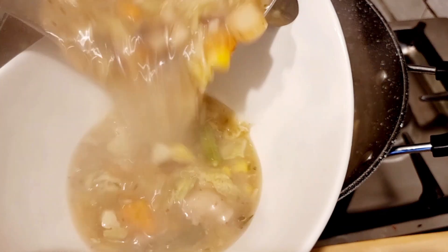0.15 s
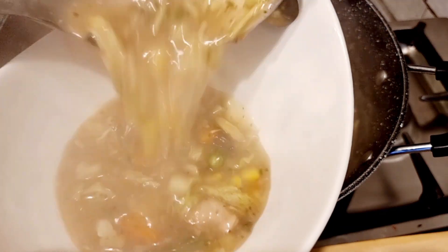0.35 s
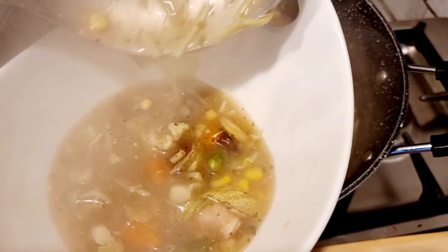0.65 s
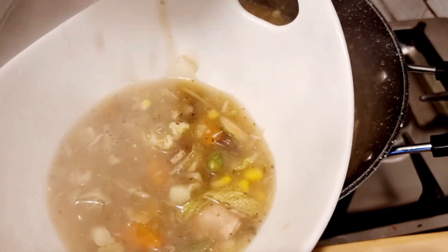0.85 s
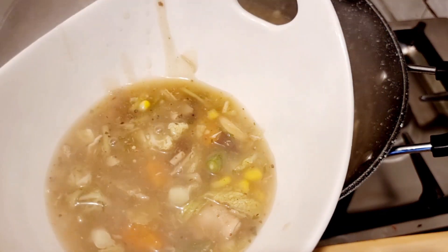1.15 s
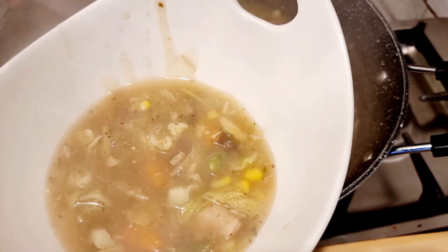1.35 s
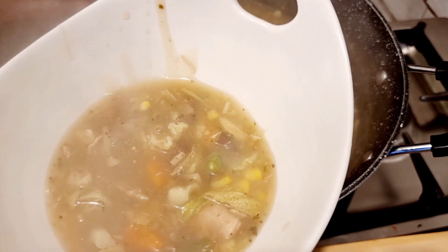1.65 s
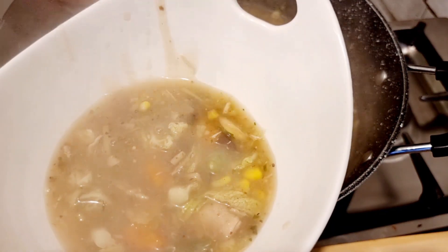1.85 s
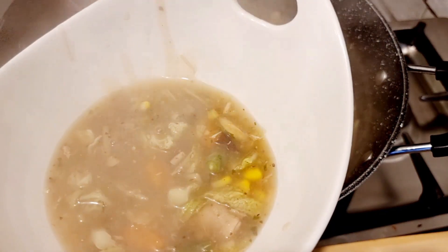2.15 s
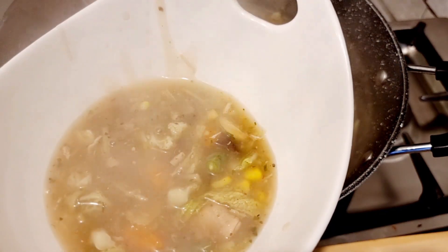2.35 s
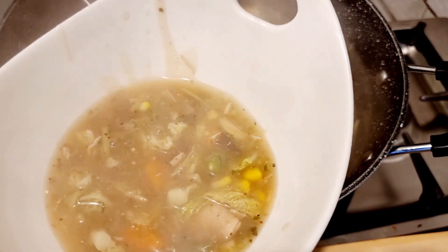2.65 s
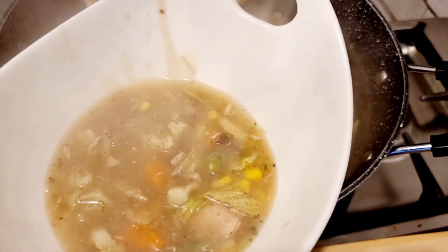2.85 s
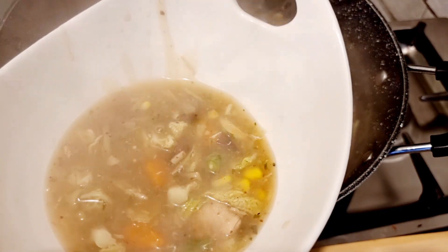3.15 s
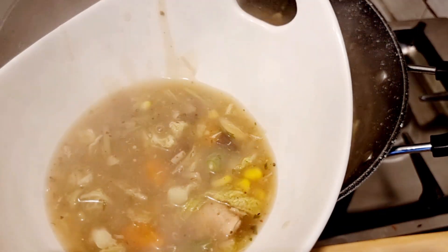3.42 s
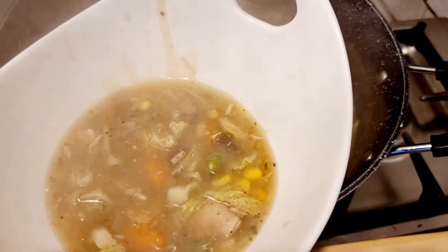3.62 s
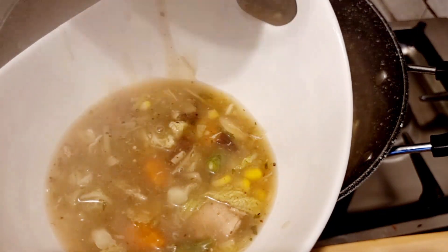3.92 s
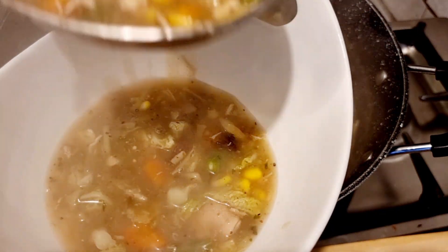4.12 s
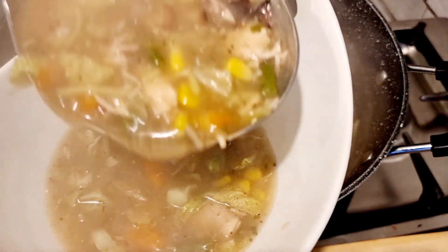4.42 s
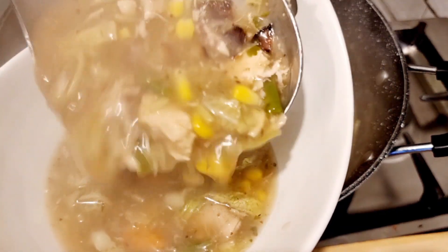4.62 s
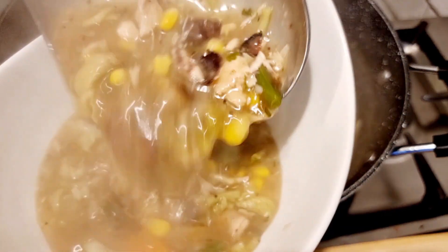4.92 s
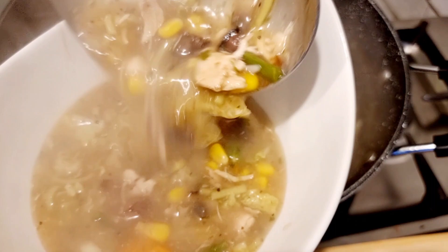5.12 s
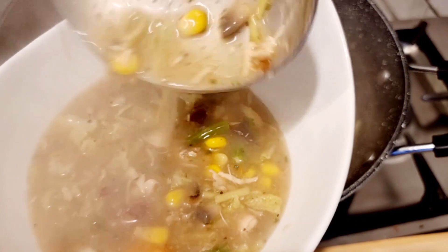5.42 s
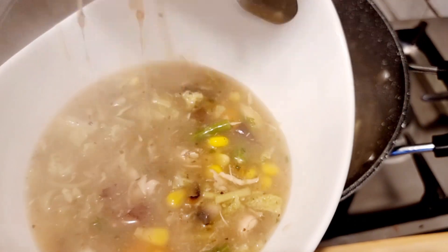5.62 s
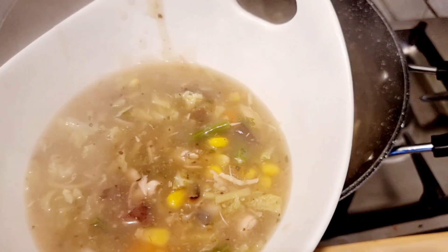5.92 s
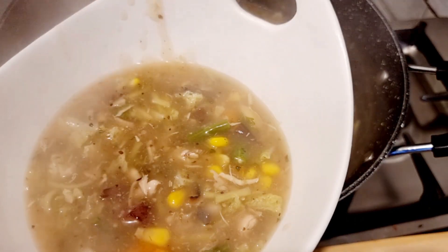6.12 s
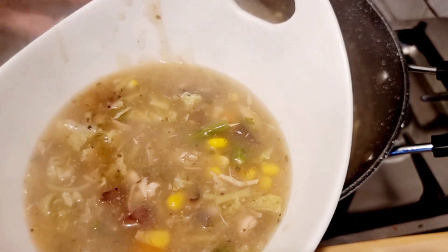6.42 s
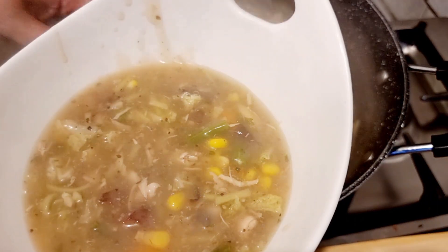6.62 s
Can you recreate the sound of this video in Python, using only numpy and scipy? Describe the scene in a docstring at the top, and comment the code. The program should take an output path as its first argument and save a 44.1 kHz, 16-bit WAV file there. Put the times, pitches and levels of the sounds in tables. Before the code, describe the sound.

Thick soup plops from a ladle into a bowl twice, and the metal ladle knocks and clinks against a pan.

```python
"""Soup ladled into a china bowl held over a pan on a kitchen stove.
Each plop is a snapping wet film, a ringing air bubble and the bowl's hollow; flowing broth adds
spatter and drips. Between helpings the metal ladle slides, clinks and knocks in the pan, which rings
and rocks on its grate. A motor, likely the fridge, hums under the air of a small, hard-walled room."""
import sys
import numpy as np
from scipy import signal
from scipy.fft import rfft, irfft, next_fast_len
from scipy.io import wavfile

SR = 44100
rng = np.random.default_rng(int(sys.argv[2]) if len(sys.argv) > 2 else 0)


def wrap_up_sound(samples):
    """Save the sound to the file named by the first command line argument, as 16-bit audio."""
    columns = np.atleast_2d(samples).T
    # keep every value between -1 and 1, then stretch to whole-number steps
    tamed = np.clip(columns, -1, 1)
    steps = np.round(tamed * 32767).astype(np.int16)
    wavfile.write(sys.argv[1], SR, steps)


N = 298557
T = np.arange(SR // 2) / SR  # time within one event, s

# kitchen reverberation: freq_hz, t60_s
ROOM_DECAY = [(150, 0.49), (500, 0.35), (1500, 0.19), (4000, 0.23), (8000, 0.24), (15000, 0.23)]
# modes of the ladle's cup: freq_hz, level_db, t60_s
LADLE_MODES = [(649, -8.5, 0.11), (1492, -9, .06), (2485, -9.5, .06), (3230, -20, .07), (4420, -12, .06),
               (4824, -5.5, 0.082), (5410, -4.5, .052), (6520, 8, .035), (7040, -5.5, 0.064),
               (7430, -2.5, .13), (7750, -3, .05), (8460, -11, 0.2), (11200, -17, .12), (12700, -18, .18),
               (13740, -24, .083)]
# steel edge grating: freq_hz, density_db
SCRATCH_SPECTRUM = [(250, -31), (600, 0.5), (2000, -4), (5000, 4.5), (7500, -2.5), (10000, -8),
                    (15500, -12)]
# wet film snapping: freq_hz, density_db
SNAP_SPECTRUM = [(300, -30.5), (750, 4.5), (2000, -10.5), (4000, -14), (7000, 0.5), (10000, -4.5),
                 (15500, -2)]


def amp(db):
    """Decibels to gain."""
    return 10 ** (np.asarray(db) / 20)


def unit(x):
    """Scale to rms 1."""
    return x / np.sqrt(np.mean(x ** 2) + 1e-20)


def read(points, hz):
    """Interpolate a table over log frequency."""
    f, value = np.transpose(points)
    return np.interp(np.log(hz + 1), np.log(f + 1), value)


def bell(hz, centre_hz, width_oct):
    """Gaussian weight over log frequency."""
    return np.exp(-.5 * (np.log2(hz / centre_hz) / width_oct) ** 2)


def fade(t60_s):
    """Exponential decay, 60 dB in t60_s."""
    return np.exp(-np.log(1000) * T / t60_s)


def shaped(x, gain):
    """Filter by gain(freq_hz)."""
    size = x.shape[-1]
    return irfft(rfft(x) * gain(np.fft.rfftfreq(size, 1 / SR)), size)


def hiss(spectrum):
    """Half a second of coloured stereo noise."""
    return unit(shaped(rng.standard_normal((2, len(T))), lambda f: amp(read(spectrum, f))))


def band_decay(x, decays):
    """Fade each band at its own rate."""
    bands_hz, t60s = zip(*decays)
    return sum(shaped(x, lambda f: read(list(zip(bands_hz, share)), f)) * fade(t60_s)
               for share, t60_s in zip(np.eye(len(decays)), t60s))


def narrow_noise(hz, width_hz, size):
    """Stereo noise through one resonance."""
    return unit(shaped(rng.standard_normal((2, size)), lambda f: 1 / (1 + ((f - hz) / width_hz * 2) ** 2)))


def sides(balance_db):
    """Channel gains for a left-minus-right level."""
    return amp([[balance_db / 2], [-balance_db / 2]])


def ring(hz, t60_s, lag_ms):
    """Damped sine, later in the right channel."""
    t = np.maximum(T - np.array([[0], [lag_ms * 1e-3]]), 0)
    return np.sin(2 * np.pi * hz * t) * fade(t60_s)


def add(mix, start_s, sound):
    """Mix a sound in at start_s."""
    part = mix[:, round(start_s * SR):][:, :sound.shape[1]]
    part += sound[:, :part.shape[1]]


def room(x, near_db, near_t60_s, tail_db):
    """Add quick reflections off the cookware, then the kitchen's tail."""
    taps = rng.choice([-1., 1.], (2, 2, len(T))) * (rng.random((2, 2, len(T))) < .12)
    near = taps[0] * fade(near_t60_s) * (T > .0007)
    tail = band_decay(taps[1], ROOM_DECAY) * np.clip((T - .003) / 0.008, 0, 1)
    echo = (amp(near_db) * unit(near) + amp(tail_db) * unit(tail)) / np.sqrt(len(T))
    return x + signal.fftconvolve(x, echo, axes=1)[:, :N]


def room_air(level_db=-62):
    """Soft moving air with a few steady whistles."""
    # air noise: freq_hz, density_db
    spectrum = [(20, -11.5), (45, -2.5), (75, 3), (115, -4), (200, -9.5), (320, -19.5), (550, -17.5),
                (1000, -17), (1500, -28), (2200, -36), (4000, -41), (7000, -47), (10000, -49), (15000, -44)]
    # left-right likeness: freq_hz, correlation
    likeness = [(60, 1), (130, 0.84), (290, 0.026), (640, -0.53), (1400, -0.35), (3100, 0.0071),
                (15000, 0.024)]
    # left minus right: freq_hz, balance_db
    balance = [(60, -1), (200, -7), (400, 1.5), (700, -1), (1300, -3), (15000, -1)]
    # whistles: pitch_hz, width_hz, level_db
    whistles = [(553, 46, -80.5), (924, 170, -80), (4150, 120, -96.5), (5274, 130, -94.5)]
    size = next_fast_len(N)
    f = np.fft.rfftfreq(size, 1 / SR)
    left, independent = rfft(rng.standard_normal((2, size)))
    correlation = read(likeness, f)
    right = correlation * left + np.sqrt(1 - correlation ** 2) * independent
    tilt_db = read(balance, f) / 2
    pair = np.array([left * amp(tilt_db), right * amp(-tilt_db)])
    air = amp(level_db) * unit(irfft(pair * amp(read(spectrum, f)), size))
    air += sum(amp(db) * narrow_noise(hz, width_hz, size) for hz, width_hz, db in whistles)
    return air[:, :N]


def motor_hum():
    """Two low motor lines beating."""
    # motor lines: freq_hz, rms_db
    lines = [(49.0, -48.9), (57.2, -66)]
    t = np.arange(N) / SR
    hum = sum(amp(db) * np.sqrt(2) * np.sin(2 * np.pi * (hz * t + rng.random())) for hz, db in lines)
    return hum * sides(-4.5)


def ladle_rubs(glide_width_hz=350, mode_width_hz=110, rub_hz=4200, rub_oct=1.0, grit_db=-9):
    """Wet steel whispers over the pan bottom; a catching rim excites the ladle's modes and adds grit."""
    # glides on the bottom: start_s, length_s, level_db, pitch_hz
    glides = [(1.418, 0.39, -72, 1580), (3.615, .63, -75.5, 1516), (6.604, .05, -47, 1060)]
    # rim scrapes: start_s, length_s, level_db
    scrapes = [(1.001, 0.1, -74), (1.11, 0.13, -71)]
    out = np.zeros((2, N))
    for start_s, length_s, db, hz in glides:
        size = int(length_s * SR)
        whisper = narrow_noise(hz, glide_width_hz, size)
        add(out, start_s, amp(db) * whisper * signal.windows.tukey(size, .5))
    for start_s, length_s, db in scrapes:
        size = int(length_s * SR)
        modes = sum(bell(hz, rub_hz, rub_oct) * narrow_noise(hz, mode_width_hz, size)
                    for hz, _, _ in LADLE_MODES)
        grit = amp(grit_db) * hiss(SNAP_SPECTRUM)[:, :size]
        add(out, start_s, amp(db) * (unit(modes) + grit) * signal.windows.tukey(size, .8))
    return out * sides(-2.1)


def ladle_clinks(tick_db=-4, cup_db=-11, chatter_db=-11):
    """The cup rings and its edge chatters; soft contact cuts the highs."""
    # light taps: start_s, level_db, contact_cutoff_hz
    taps = [(1.381, -35, 820), (2.416, -32.5, 566), (3.44, -32.5, 928), (3.5022, -29.5, 15000),
            (3.505, -39.5, 9130), (6.2233, -35, 657)]
    out = np.zeros((2, N))
    for start_s, db, cutoff_hz in taps:
        cup = sum(amp(mode_db) * ring(hz, t60_s, lag_ms=rng.uniform(0, 0.99))
                  for hz, mode_db, t60_s in LADLE_MODES)
        tick = amp(tick_db) * hiss(SNAP_SPECTRUM) * fade(0.0096)
        chatter = amp(chatter_db) * hiss(SCRATCH_SPECTRUM) * fade(0.072)
        lowpass = signal.butter(2, cutoff_hz, fs=SR)
        add(out, start_s, amp(db) * signal.lfilter(*lowpass, amp(cup_db) * cup + tick + chatter))
    return room(out * sides(-1.93), near_db=-5, near_t60_s=0.037, tail_db=-10)


def pan_ring(spot_hz, cutoff_hz, focus_oct=0.21, off_spot_db=-14):
    """The spot struck favours modes near spot_hz; soft contact weakens the high ones."""
    # modes of the pan with the ladle in it: freq_hz, level_db, t60_s
    modes = [(286.7, -6, 0.36), (337.4, -9.5, 0.29), (388, -4, 0.16), (430.8, 1, 0.32), (481.7, 0.5, 0.196),
             (516, -2.5, 0.056), (636, -8.5, 0.32), (715, -8.5, 0.091), (750, -8.5, 0.17), (1035, -3, 0.12),
             (1150, -9.5, 0.14), (1247, 1, 0.026), (1307, -13.5, 0.11), (1568, -15, 0.21),
             (1715, -17.5, 0.18), (2374, -7.5, 0.23), (2838, 3.5, 0.03), (2930, -15, 0.17),
             (3140, -20.5, 0.23), (4000, -15, 0.22), (5140, -8, 0.17)]
    out = 0
    for (hz, db, t60_s), detune in zip(modes, rng.standard_normal(len(modes))):
        spot_db = off_spot_db * (1 - bell(hz, spot_hz, focus_oct))
        gain = amp(db + spot_db) / np.hypot(1, hz / cutoff_hz / 2)
        out += np.sign(detune) * gain * ring(hz * (1 + 0.0096 * detune), t60_s, lag_ms=0.668)
    return out


def pan_thud():
    """The full pan rocks on its grate: a low swell, then a faint after-ring."""
    # rocking: pitch_hz, swell_s, after_db, after_t60_s
    rocking = (166, .028, -16, .25)
    hz, swell_s, after_db, after_t60_s = rocking
    swell = T / swell_s * np.exp(.5 - .5 * (T / swell_s) ** 2)
    after_ring = amp(after_db) * fade(after_t60_s) * np.minimum(T / swell_s / 2, 1)
    return np.sin(2 * np.pi * hz * T) * (swell + after_ring)


def pan_clatter(cutoff_hz):
    """Undecayed noise for a blow's crowded modes, low-passed by the contact."""
    # crowded modes: freq_hz, density_db
    spectrum = [(60, -40), (115, 1), (220, -6.5), (330, 0), (600, -0.5), (1100, -1), (1600, -1.5),
                (2050, -3.5), (2900, -2.5), (4000, -5.5), (7000, -16.5), (15000, -30.5)]
    return shaped(hiss(spectrum), lambda f: 1 / np.hypot(1, (f / cutoff_hz) ** 2))


def pan_knocks(direct_db=1, tail_db=-13, attack_s=0.0026, tail_rise_s=0.014):
    """Each ladle blow rings, clatters and rocks the pan; the kitchen adds a diffuse tail."""
    # blows: start_s, ring_db, spot_hz, clatter_db, contact_cutoff_hz, thud_db, scratch_db
    blows = [(1.6984, -33.5, 1560, -31.5, 1800, -40, -46), (1.709, -31, 472, -41, 890, -58, -50),
             (1.719, -35, 500, -35, 2970, -67, -41.5), (1.7822, -28.5, 630, -26, 600, -31.5, -61),
             (1.924, -52, 453, -66, 397, -52, -90), (2.802, -40, 1430, -56, 2600, -70, -71),
             (2.8174, -48, 710, -25.5, 2600, -39, -56), (2.8212, -20.5, 956, -27.5, 2100, -61, -48.5),
             (2.8489, -40, 458, -25.5, 1320, -42, -45.5), (2.86, -39.5, 710, -46, 1000, -48, -62),
             (3.504, -42, 715, -46, 1009, -61.5, -76.5), (6.4396, -18.5, 2930, -14.5, 3000, -50, -27.5),
             (6.443, -18.5, 1170, -20.5, 1700, -56, -62), (6.4471, -19.5, 342, -29, 1300, -17.5, -35),
             (6.549, -29.5, 685, -37, 684, -38, -72), (6.64, -36, 885, -33.5, 2090, -45, -64),
             (6.648, -34.5, 427, -27.5, 1010, -65, -52), (6.667, -41.5, 417, -40, 900, -44, -53)]
    # damping of the clatter: freq_hz, t60_s
    clatter_decay = [(150, 0.39), (500, 0.16), (1200, 0.039), (3000, 0.02), (12000, 0.009)]
    out = np.zeros((2, N))
    thud = pan_thud() * sides(-3.5)
    for start_s, ring_db, spot_hz, clatter_db, cutoff_hz, thud_db, scratch_db in blows:
        clatter, far_clatter = (amp(clatter_db) * pan_clatter(cutoff_hz) for _ in range(2))
        scratch, far_scratch = (amp(scratch_db) * hiss(SCRATCH_SPECTRUM) for _ in range(2))
        direct = band_decay(clatter, clatter_decay) + scratch * fade(0.049)
        tail = band_decay(far_clatter + far_scratch, ROOM_DECAY) * np.minimum(T / tail_rise_s, 1)
        blow = amp(ring_db) * pan_ring(spot_hz, cutoff_hz) + amp(direct_db) * direct + amp(tail_db) * tail
        add(out, start_s, blow * np.minimum(T / attack_s, 1) * sides(-2.5) + amp(thud_db) * thud)
    return out


def plop(bubble_db, hz, snap_db, rise=0.56, lag_ms=.2, tone_db=1, slop_db=-5, hollow_cutoff_hz=2500):
    """A film snaps, trapped air rings with rising pitch, and thick broth slops around that pitch."""
    # hollow of the bowl: freq_hz, level_db, t60_s
    bowl_modes = [(793, -21.5, 0.053), (1024, -14.5, 0.051), (1285, -11.5, 0.022)]
    life_s = 15 / hz + 0.0051
    glide = 1 + rise * (np.minimum(T / life_s, 1) - .2) / 2
    bubble = amp(tone_db) * ring(hz * glide, life_s, lag_ms)
    slop = unit(shaped(rng.standard_normal((2, len(T))), lambda f: bell(f + 1, hz, width_oct=0.68)))
    slop *= fade(0.027) * amp(slop_db + 0.28 * (snap_db - bubble_db))  # hard drops splash more
    hollow = sum(amp(db) * ring(mode_hz * rng.uniform(1, 1.05), t60_s, lag_ms)
                 for mode_hz, db, t60_s in bowl_modes)
    hollow /= 1 + (hz / hollow_cutoff_hz) ** 2  # big, low lumps stir the bowl's air most
    snap = hiss(SNAP_SPECTRUM) * (fade(0.0042) + 0.2 * fade(0.036))
    attack = np.minimum(T / .0012, 1)
    return (amp(bubble_db) * (bubble + slop + hollow) + amp(snap_db) * snap) * attack


def flow_db(t, length_s, swell_s=0.051, drain_db_per_s=116):
    """Level t seconds into a flow: swell, hold, drain."""
    return 20 * np.log10(np.clip(t / swell_s, .001, 1)) - drain_db_per_s * np.maximum(t - length_s, 0)


def drips(length_s, count=16, gap_s=0.038, spread_db=3.5, pitch_hz=4680, spread_oct=0.94):
    """Small drips shed unevenly by a flow: delay_s, level_db, pitch_hz."""
    delays_s = (np.arange(count) + rng.random(count)) * gap_s
    levels_db = flow_db(delays_s, length_s) + spread_db * rng.uniform(-1.45, 1, count)
    pitches_hz = pitch_hz * 2 ** (spread_oct * rng.uniform(-0.8, 1, count))
    return zip(delays_s, levels_db, pitches_hz)


def spatter(rate_per_s=700):
    """Fine specks of broth: random impulses of uneven size."""
    # spatter colour: freq_hz, density_db
    spectrum = [(400, -16), (750, 7.5), (2000, -2.5), (4000, -3.5), (7000, -5.5), (10000, -10),
                (15500, -5.5)]
    specks = rng.standard_normal((2, N)) * (rng.random(N) < rate_per_s / SR)
    specks *= amp(4.3 * np.minimum(rng.exponential(1, N), 3))
    return unit(shaped(specks, lambda f: amp(read(spectrum, f))))


def soup(spatter_db=-2, drip_bubble_db=15.5, drip_snap_db=18):
    """Lumps plop; each flow of broth adds spatter and drips."""
    # plops and bursting bubbles: start_s, bubble_db, pitch_hz, snap_db, balance_db
    plops = [(.081, -53, 3000, -37.5, 6.5), (.0995, -34.5, 6300, -47, -1.5), (.148, -47.5, 2670, -53, 5),
             (.2262, -35.5, 1920, -24, 3), (.2447, -26.5, 1510, -53, 2.5), (.395, -44, 3120, -31, 5),
             (.4096, -27.5, 3460, -42, 1.5), (.414, -35, 1730, -42, 4), (.4679, -39, 4230, -33, 0),
             (.4828, -26, 3650, -41, -2), (.4967, -32.5, 3540, -33, -0.5), (0.5511, -50, 7900, -35, 0),
             (.564, -33, 3580, -42, -2), (.5797, -31.5, 1474, -36, 0), (1.3762, -58, 5900, -37.5, -5),
             (1.519, -49, 5200, -88, -2), (2.367, -51.5, 1125, -78, 1), (2.431, -41, 2390, -129, -7.5),
             (2.4837, -48.5, 6800, -92, -6.5), (2.57, -54, 4800, -43.5, -8.5),
             (2.659, -41, 3180, -46.5, -8), (2.671, -38.5, 2450, -50, -7),
             (3.223, -48.5, 3260, -31.5, -2.5), (3.2301, -37.5, 2390, -65.5, -12.5),
             (3.2751, -75, 2500, -44, 1), (3.32, -39, 8660, -56, -1), (3.3646, -42, 8850, -41, 0),
             (3.4371, -37.5, 2520, -38.5, -9.5), (3.4651, -32.5, 11300, -51, -5),
             (3.502, -32, 7250, -41, 0), (3.746, -35.5, 8030, -98, -3), (3.9901, -42, 7950, -83, -4),
             (4.453, -51.5, 11840, -79, 2), (4.7497, -77, 7000, -43, 2.5), (4.854, -52.5, 5300, -41, -2),
             (4.9386, -44, 5460, -40.5, 0), (5.0082, -35.5, 4630, -78, 0), (5.0864, -46, 4970, -46, -1),
             (5.1123, -32, 1228, -47, 2.5), (5.116, -45, 850, -53, 9), (5.1851, -45, 4690, -46, 2),
             (5.26, -54, 6900, -39.5, -1.5), (5.3709, -30, 6750, -38.5, -1), (5.374, -37.5, 1710, -41, 3.5),
             (6.125, -59.5, 9570, -70, -6.5), (6.309, -55, 8500, -83, -4)]
    # broth poured or stirred: start_s, length_s, level_db, balance_db
    flows = [(0.07, 0.41, -63, -0.5), (1.361, 0.17, -76, -3), (2.506, 0.12, -69, -2),
             (3.185, 0.33, -70, -6), (4.791, 0.6, -74.5, 1.5)]
    out, t = np.zeros((2, N)), np.arange(N) / SR
    for start_s, bubble_db, hz, snap_db, balance_db in plops:
        add(out, start_s, plop(bubble_db, hz, snap_db) * sides(balance_db))
    spray = amp(spatter_db) * spatter()
    for start_s, length_s, db, balance_db in flows:
        gain = amp(db) * sides(balance_db)
        out += gain * spray * amp(flow_db(t - start_s, length_s)) * (t > start_s)
        for delay_s, drip_db, hz in drips(length_s):
            add(out, start_s + delay_s, gain * amp(drip_db) * plop(drip_bubble_db, hz, drip_snap_db))
    return room(out, near_db=-3.5, near_t60_s=0.058, tail_db=-11)


def scene():
    """All sources, in stereo."""
    return pan_knocks() + ladle_clinks() + soup() + ladle_rubs() + motor_hum() + room_air()


def record(dry):
    """Steep low-pass at 15.9 kHz."""
    lowpass = signal.firwin(401, 15900, window=("kaiser", 9), fs=SR)
    return signal.oaconvolve(dry, lowpass[None], "same")


dry = scene()
out = record(dry)
wrap_up_sound(out)
```